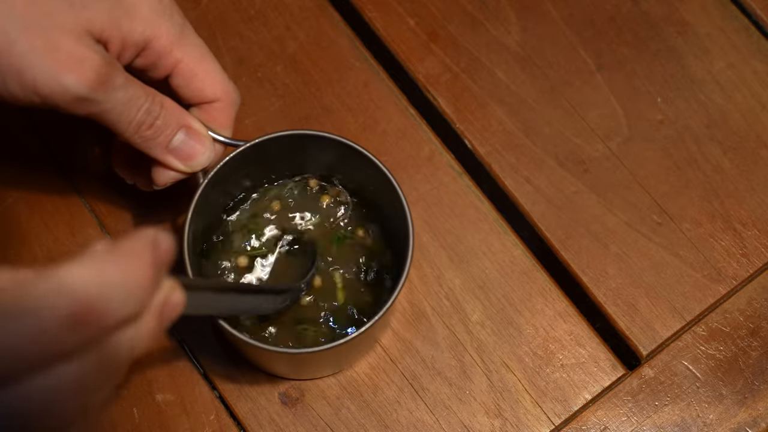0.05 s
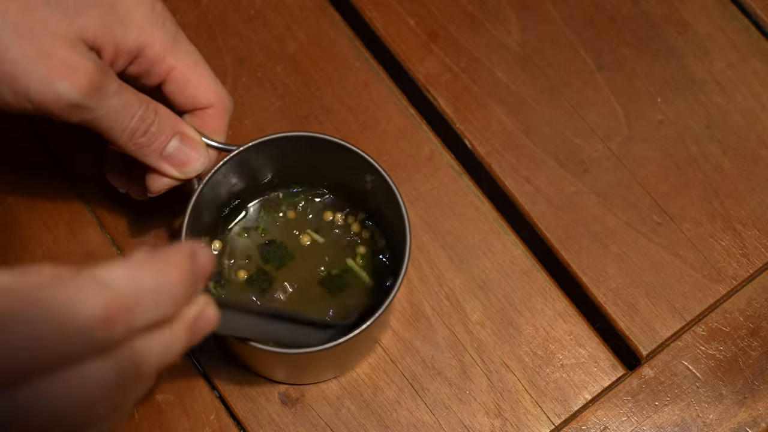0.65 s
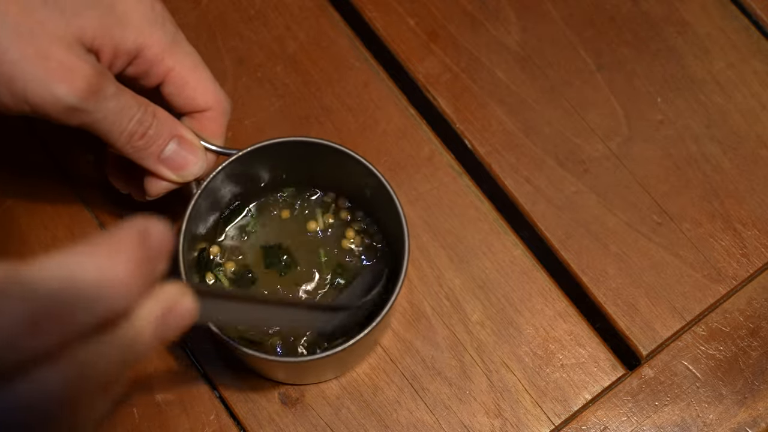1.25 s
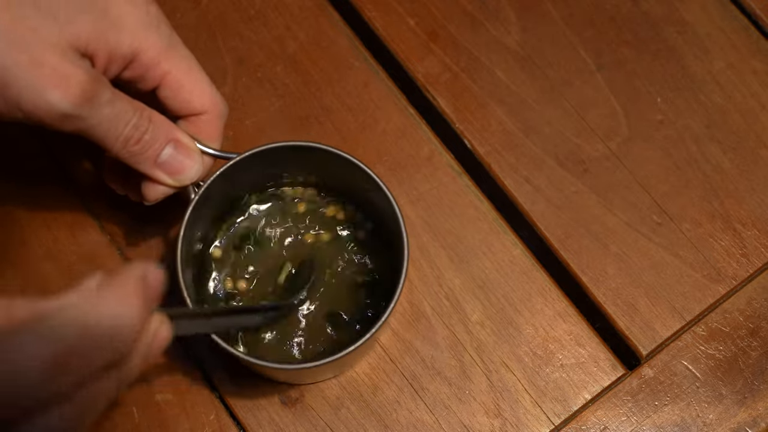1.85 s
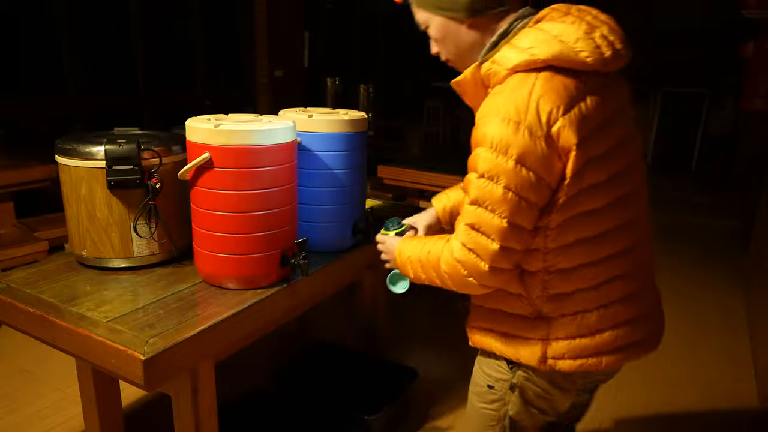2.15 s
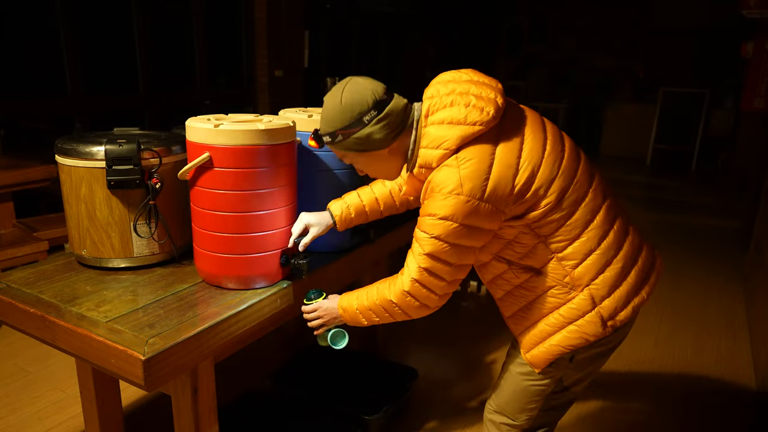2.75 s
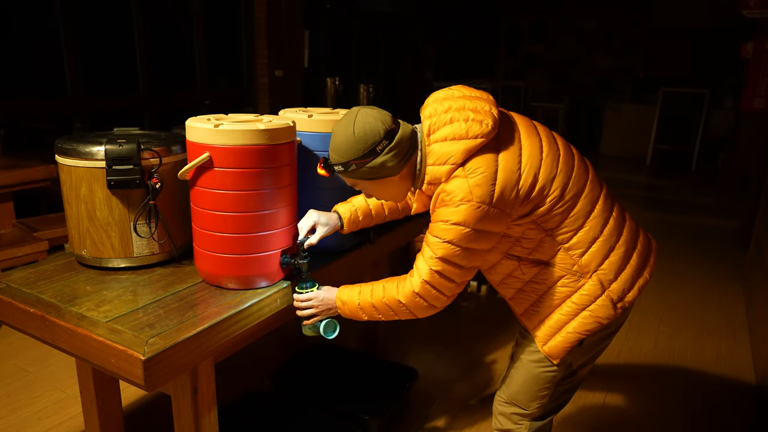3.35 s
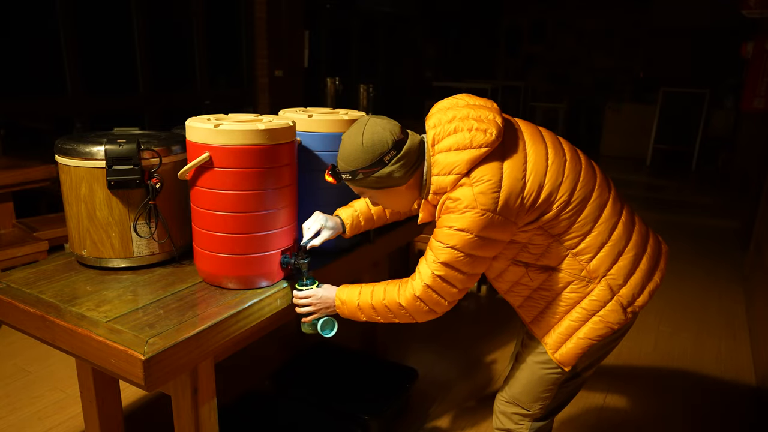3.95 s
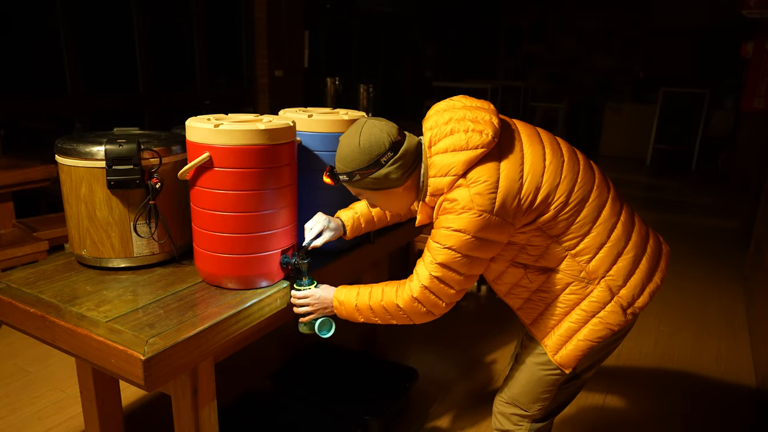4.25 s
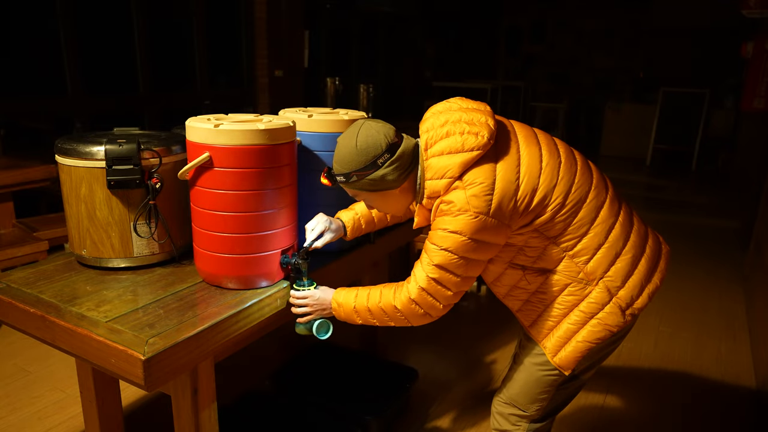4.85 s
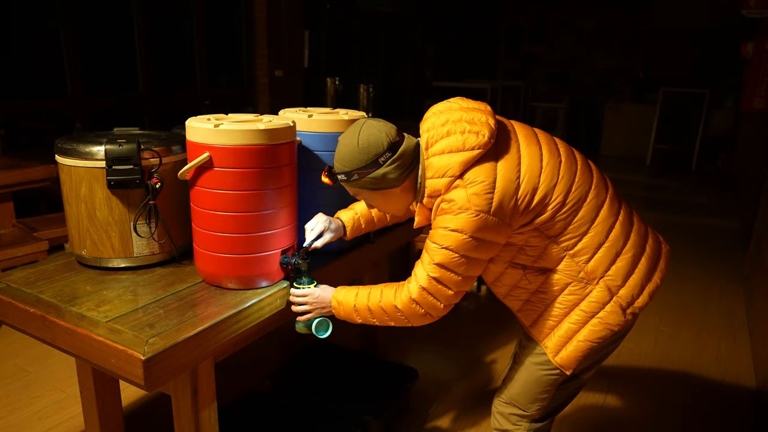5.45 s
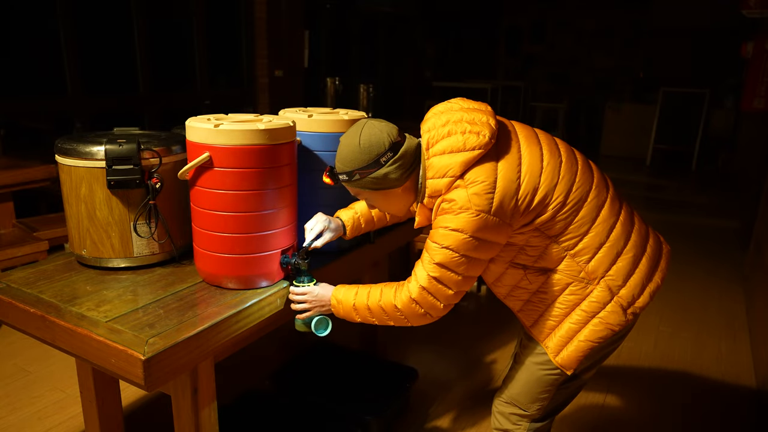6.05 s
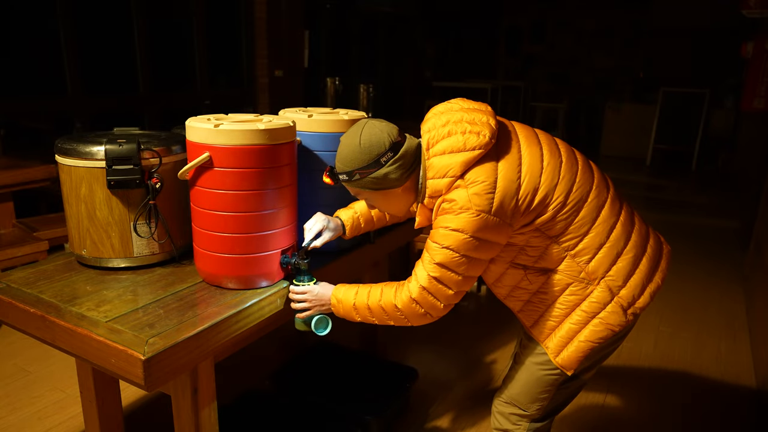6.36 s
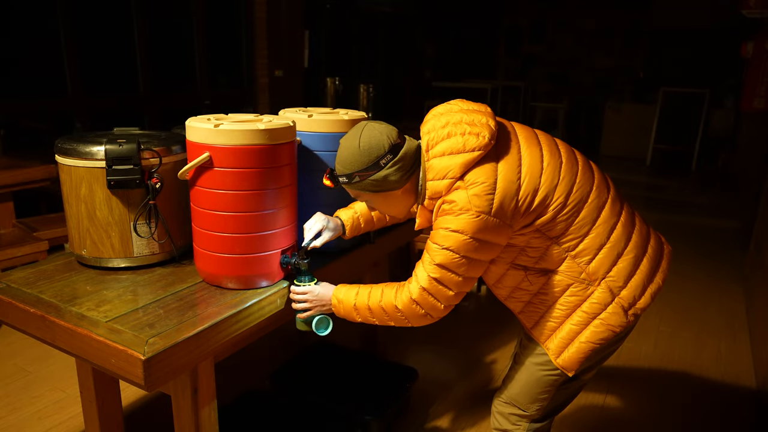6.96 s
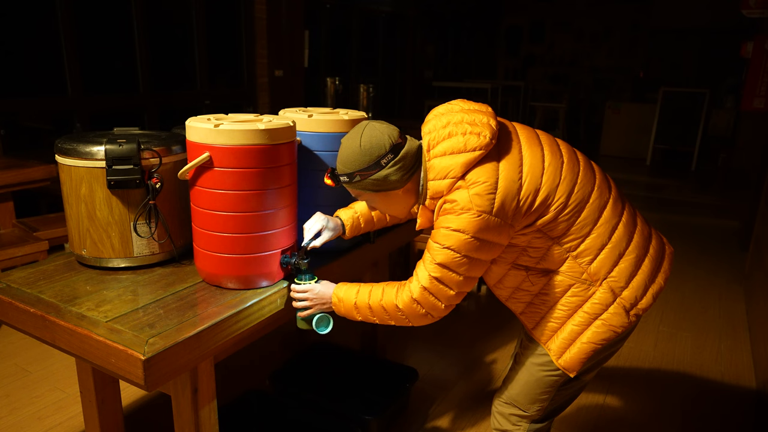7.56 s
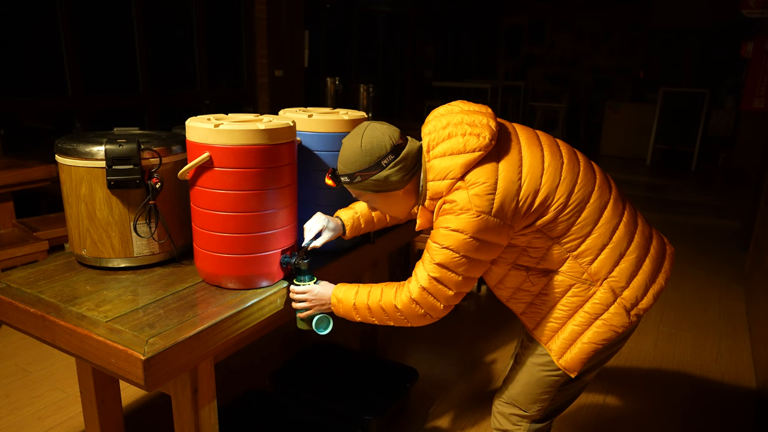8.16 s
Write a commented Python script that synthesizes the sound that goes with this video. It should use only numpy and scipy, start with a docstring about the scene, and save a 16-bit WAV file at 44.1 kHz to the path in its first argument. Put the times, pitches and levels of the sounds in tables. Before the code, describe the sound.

Close stirring in a metal cup gives way to rustling nylon and water trickling from a tap into a bottle in a quiet room.

```python
"""In a quiet hut a spoon stirs soup, scraping and knocking a small metal cup on a wooden table.
Stick-slip friction and impacts excite the cup's modes; near 2 s a bump shakes the microphone.
Then, farther off, a down jacket rustles by friction as someone bends to a water jug.
At 4.2 s its tap opens: a thin stream plops and spatters into a bottle, trapping bubbles that ring.
As the bottle fills, its air column shortens and rises in pitch."""
import sys
import numpy as np
from scipy import signal
from scipy.io import wavfile
from scipy.ndimage import uniform_filter1d

SR = 44100
rng = np.random.default_rng(int(sys.argv[2]) if len(sys.argv) > 2 else 0)


def put_to_file(sound):
    """Save the sound as 16-bit audio at rate SR, in the file named by the first command-line argument."""
    columns = np.atleast_2d(sound).T  # one column per channel
    safe = np.clip(columns, -1, 1)
    whole_steps = np.round(safe * 32767)
    wavfile.write(sys.argv[1], SR, whole_steps.astype(np.int16))


N = 361619
T = np.arange(N) / SR
CUT_S = 2.053  # the scene moves from the table to the jug
OPEN_S, FULL_S = 4.23, 4.42  # the tap dribbles, then runs freely

# Spectrum of rustling nylon, also the hiss of the soup: frequency_hz, gain_db
RUSTLE_SPECTRUM = [(120, -31), (250, -15.5), (600, -10), (1050, -1.5), (1800, 6), (4000, 6), (7500, 2),
                   (12000, -11.5), (16000, -11)]
# Spectrum of a steel edge on metal: frequency_hz, gain_db
EDGE_SPECTRUM = [(1200, -27), (2000, 1), (2400, -1), (3400, 1.5), (4700, -7), (5900, 0), (7000, -2.5),
                 (11000, -6.5), (16000, -4.5)]
# Resonance of the air above the water: time_s, pitch_hz
AIR_COLUMN = [(4.2, 1435), (4.7, 1506), (5.3, 1563), (6, 1613), (7, 1730), (8.2, 1800)]


def amp(db):
    """Converts decibels to an amplitude ratio."""
    return 10 ** (np.asarray(db) / 20)


def unit(x):
    """Normalises to rms 1."""
    return x / np.sqrt(np.mean(x ** 2) + 1e-20)


def peaked(x):
    """Normalises to peak 1."""
    return x / (abs(x).max() + 1e-20)


def equal_energy(x, over_s=0.01):
    """Normalises a transient to the energy of rms 1 held for over_s."""
    return x / np.sqrt(np.sum(x ** 2) / (over_s * SR) + 1e-20)


def read(points, hz):
    """Interpolates a curve on a log-frequency axis."""
    f, value = np.transpose(points)
    return np.interp(np.log(hz + 1), np.log(f + 1), value)


def follow(points, time_s=T):
    """Interpolates a curve in time."""
    return np.interp(time_s, *np.transpose(points))


def between(start_s, end_s, fade_s=0.00084):
    """A gate with linear ramps."""
    return np.clip((T - start_s) / fade_s, 0, 1) * np.clip((end_s - T) / fade_s, 0, 1)


def add(mix, start_s, sound):
    """Superposes a sound on the mix."""
    part = mix[max(round(start_s * SR), 0):][:len(sound)]
    part += sound[:len(part)]


def colour(x, spectrum, size=4096):
    """A minimum-phase filter with the given spectrum."""
    log_gain = np.log(amp(np.maximum(read(spectrum, abs(np.fft.fftfreq(size, 1 / SR))), -100)))
    taps = np.fft.ifft(np.exp(np.conj(signal.hilbert(log_gain)))).real
    return signal.oaconvolve(x, taps[:size // 2])[:len(x)]


def passband(x, kind, hz, order=2):
    """A maximally flat low-, high- or band-pass filter."""
    return signal.sosfilt(signal.butter(order, hz, kind, fs=SR, output="sos"), x)


def resonate(x, hz, width_hz):
    """A damped resonator of gain about 1 at a fixed or moving pitch."""
    r = np.exp(-np.pi * width_hz / SR)
    if np.ndim(hz) == 0:
        return 2 * signal.lfilter([1 - r], [1, -r * np.exp(2j * np.pi * hz / SR)], x + 1e-18).real
    turn = np.exp(2j * np.pi * np.cumsum(hz) / SR)
    return 2 * (turn * signal.lfilter([1 - r], [1, -r], x / turn + 1e-18)).real


def grains(per_s, spread_db, count=N):
    """Shot noise: random impulses of either sign, a few larger than the rest by a spread in level."""
    size = amp(spread_db * np.minimum(rng.exponential(1, count), 3.5))
    return size * rng.choice([-1, 1], count) * (rng.random(count) < per_s / SR)


def burst(decay_s, count=3500):
    """Exponentially decaying noise."""
    return rng.standard_normal(count) * np.exp(-np.arange(count) / SR / decay_s)


def bubble(hz, rise_s, glide=0., count=3500):
    """Trapped air pulsates as a damped oscillator, its pitch gliding up as it nears the surface."""
    age = np.arange(count) / SR / rise_s
    envelope = np.tanh(1.73 * age) * np.exp(-(age / 2.29) ** 1.115)
    pitch_hz = hz * (1 + glide * np.tanh(age / 2 - 1))
    return peaked(envelope) * np.sin(2 * np.pi * np.cumsum(pitch_hz) / SR)


def hush(level_db=-61):
    """The hut's noise floor: steady broadband noise, strongest in the bass."""
    # frequency_hz, gain_db
    spectrum = [(12, -49.5), (20, -8.5), (96, 5.5), (182, -2.5), (293, -4.5), (337, -5), (590, -4.5),
                (873, -8), (1220, -5.5), (2460, -15.5), (4540, -20), (6360, -18.5), (8410, -24.5),
                (14700, -17.5), (16000, -21.5)]
    return amp(level_db) * unit(colour(rng.standard_normal(N), spectrum))


def hut(x):
    """Reverberation: dense reflections from wooden walls decay exponentially, the treble first."""
    # Reverberation times: frequency_hz, t60_s
    decay_times = [(200, 1), (800, 0.92), (2000, 0.99), (5500, 0.41), (10000, 0.43), (16000, 0.12)]
    reflections = rng.standard_normal(SR) * (np.arange(SR) > .006 * SR)
    hz, t, spectra = signal.stft(reflections, SR, nperseg=256)
    tail = signal.istft(spectra * amp(-60 * t / read(decay_times, hz)[:, None]), SR, nperseg=256)[1]
    return signal.fftconvolve(x, tail / np.linalg.norm(tail))[:N]


def cup(x, wall_ratio=1):
    """Normal modes of the cup, damped by soup and fingers; sloshing soup shifts the upper ones."""
    # pitch_hz, width_hz, gain_db
    modes = [(190, 120, -3.5), (519.5, 25, 11), (655, 42, 3), (806, 110, 1.5), (1068, 51, 18),
             (1240, 67, 13), (1825, 100, 1.5)]
    ring = sum((-1) ** k * amp(db) * resonate(x, hz * wall_ratio if hz > 1000 else hz, width)
               for k, (hz, width, db) in enumerate(modes))
    return passband(ring, "high", 200, order=3)


def soup():
    """Flow noise: the spoon swishes through the liquid, excites the cup and frees a few bubbles."""
    # Envelope of the swish: time_s, level_db
    stirring = [(0, -47.5), (.05, -52.5), (.12, -58), (.2, -66), (.42, -99), (1.08, -85), (1.15, -44.5),
                (1.23, -53), (1.45, -65)]
    # Freed bubbles: start_s, peak_db, pitch_hz, rise_s
    bubbles = [(0.0641, -16.5, 1134, 0.0031), (0.1006, -36.5, 3500, 0.00035), (0.1227, -41, 11900, 0.00049),
               (1.947, -36.5, 1570, 0.00094)]
    flow = grains(per_s=2100, spread_db=1.0)
    slosh = unit(resonate(resonate(flow, 790, 650), 790, 650))
    hiss = unit(colour(flow, RUSTLE_SPECTRUM))
    swish = unit(0.42 * unit(cup(flow)) + 0.64 * slosh + .5 * hiss)
    out = swish * amp(follow(stirring)) * between(0, 1.3)
    for start_s, db, hz, rise_s in bubbles:
        add(out, start_s, amp(db) * bubble(hz, rise_s, glide=0.0027))
    return out


def wall(x, progress, place_spread=0.025, drift=0.035):
    """The thin wall's bright modes differ from place to place and drift as the spoon travels."""
    # pitch_hz, width_hz, gain_db
    modes = [(2824, 130, 6.5), (3300, 89, 2), (3900, 280, 1), (4400, 180, -1.5), (5020, 160, 2),
             (5600, 180, 2), (5960, 270, 5), (6600, 200, -0.5), (7440, 380, 1), (8700, 260, -5.5),
             (9900, 300, -4), (10800, 460, 1), (14400, 600, -2.5)]
    travel = drift * (np.minimum(progress, 1) - .5)
    metal = np.zeros(len(x))
    for hz, width, db in modes:
        detune = 1 + place_spread * rng.standard_normal() + travel * rng.standard_normal()
        metal += amp(db) * resonate(x, hz * detune, width)
    spot = burst(0.00086)  # each spot adds its own close, short-lived modes
    return 0.56 * metal + 0.92 * signal.fftconvolve(metal, spot / np.linalg.norm(spot))[:len(x)]


def scrapes(ease_db_per_s=191.5, lift_s=0.0031, chatter_width_hz=480, brighten=0.15, count=10000):
    """Stick-slip friction rings the cup; pressure brightens a stroke and speed raises its chatter."""
    # Spoon strokes: start_s, hardest_s, end_s, level_db, swell_db_per_s, cup_db, edge_db,
    # chatter_from_hz, chatter_to_hz, wall_ratio
    strokes = [(0.4346, 0.476, 0.49, -34.5, 109.5, -3, -8, 3060, 3860, 1.06),
               (0.521, 0.534, 0.6, -32, 600, 2, 7.5, 3620, 6200, 0.95),
               (0.568, 0.606, 0.61, -32, 160, -1, 5.5, 5660, 8050, 1.14),
               (0.616, 0.62, 0.69, -44, 30, 6, -2, 2980, 2400, 1.05),
               (.683, 0.741, 0.79, -27, 184, -1, -6, 2160, 4800, 1.01),
               (0.819, 0.86, 0.89, -35.5, 212, 3, 4.5, 2500, 3300, 1.03),
               (0.897, 0.945, 0.94, -45, 132, 7.5, 8, 2000, 2080, 1),
               (0.948, 1.003, 1.03, -37.5, 131, -2, 5, 1910, 2090, 1.02),
               (1.088, 1.125, 1.148, -36.5, 130, 2, 6.5, 3750, 5600, 1.054),
               (1.59, 1.592, 1.596, -26, 100, -5, -4.5, 3140, 6200, 1.0),
               (1.596, 1.61, 1.67, -34, 27, -1.5, -4.5, 3080, 3180, 1.02),
               (1.66, 1.731, 1.789, -23, 160, -6, -4.5, 2760, 4400, 1.094),
               (1.815, 1.855, 1.862, -41, 160, 1.5, -1, 3300, 4700, 1.1)]
    out, t = np.zeros(N), np.arange(count) / SR
    for start, hardest, end, db, swell, cup_db, edge_db, from_hz, to_hz, wall_ratio in strokes:
        slips = grains(per_s=12000, spread_db=3.5, count=count)
        grit_db = 2 * unit(uniform_filter1d(rng.standard_normal(count), size=45))
        catches = grains(per_s=700, spread_db=4.0, count=count)
        slips = unit(unit(slips * amp(grit_db)) + 0.53 * unit(catches))
        progress, past_s = t / (end - start), start + t - hardest
        contact = np.minimum(t / 0.0008, 1) * np.exp(-np.maximum(start + t - end, 0) / lift_s)
        press_db = np.minimum(swell * past_s, -ease_db_per_s * past_s)
        force = contact * amp(db + press_db)
        chatter_hz = np.interp(progress, [0, 1], [from_hz, to_hz])
        chatter = resonate(slips, chatter_hz, chatter_width_hz)
        chatter += 0.14 * resonate(slips, 1.52 * chatter_hz, chatter_width_hz)
        chatter = force * amp(-3) * unit(passband(chatter, "high", 1500))
        hiss = force * amp(edge_db - 1 + brighten * press_db) * unit(colour(slips, EDGE_SPECTRUM))
        metal = wall(hiss + .5 * chatter, progress)
        ring = amp(cup_db) * cup(slips * force, wall_ratio) / cup(slips, wall_ratio).std()
        add(out, start, ring + 0.63 * chatter + 0.8 * metal + 0.5 * hiss)
    return out


def knocks():
    """Impact excitation: steel clicks, then the cup and the table ring with their impulse responses."""
    # Blows of the spoon: start_s, ring_db, click_db, thud_db
    blows = [(0.4353, -27, -43.5, -59.5), (0.503, -45, -35.5, -59.5), (0.558, -21, -36, -47.5),
             (0.6049, -10, -7, -13.5), (0.782, -30, -23, -33), (0.877, -28, -45, -50),
             (0.867, -29.5, -40, -38.5), (1.089, -30, -28, -50.5), (1.147, -48.5, -49, -34.5),
             (1.59, -26, -23.5, -60), (1.66, -22.5, -20, -37)]
    # Modes of the wooden table: pitch_hz, width_hz, weight_db
    board_modes = [(139, 22, -17), (220, 16, -13), (439, 11, 2), (500, 11.3, 10), (570, 5, 2)]
    out, impulse = np.zeros(N), signal.unit_impulse(SR // 3)
    ring = peaked(cup(impulse))
    boards = sum(amp(db) * resonate(impulse, hz, width) / np.sqrt(width) for hz, width, db in board_modes)
    thud = peaked(passband(boards, "high", 93))
    for start_s, ring_db, click_db, thud_db in blows:
        click = np.tanh(unit(colour(burst(decay_s=0.0004), EDGE_SPECTRUM)) / 4)
        add(out, start_s, amp(click_db) * peaked(passband(click, "high", 400)))
        add(out, start_s + 0.00261, amp(ring_db) * ring)
        add(out, start_s + 0.00366, amp(thud_db) * thud)
    return out


def bump():
    """Structure-borne sound: the bumped microphone shudders at its mount's natural frequencies."""
    # Modes of the mount: pitch_hz, gain_db
    modes = [(42, 15), (82, 10)]
    # Envelope of the shudder: time_s, level_db
    shudder = [(1.85, -52), (1.87, -38), (1.96, -31.5), (1.986, -37), (2.01, -37), (2.05, -42.5)]
    shake = sum(amp(db) * np.sin(2 * np.pi * hz * T) for hz, db in modes)
    rumble = passband(rng.standard_normal(N), "low", 110, order=4)
    envelope = amp(follow(shudder)) * between(1.855, CUT_S + 0.0055, fade_s=0.0083)
    return unit(unit(shake) + 0.22 * unit(rumble)) * envelope


def jacket(weave_hz=3300, weave_rise_hz=1150, crumple_db=0.6):
    """Friction noise: padding rubs, nylon hisses, and sleeves zip higher as they slide faster."""
    # Turning, bending, reaching and settling: fastest_s, half_length_s, rub_db, swish_db
    moves = [(2.098, 0.25, -55, -50.5), (2.534, 0.29, -47, -44.5), (2.897, 0.2, -64.5, -52),
             (3.44, 0.4, -64.5, -62.5), (3.962, 0.018, -60, -81), (4.066, 0.026, -63, -80),
             (4.187, 0.029, -66, -84)]
    speed = np.array([np.exp(-((T - s) / half_s) ** 2) for s, half_s, _, _ in moves])
    rub, swish = np.sqrt(amp(np.transpose(moves)[2:]) ** 2 @ speed ** 2)  # moves add in power
    cloth = colour(grains(per_s=6800, spread_db=0.0), RUSTLE_SPECTRUM)
    padding = unit(passband(cloth, "band", [180, 815]))
    weave = unit(resonate(cloth, weave_hz + weave_rise_hz * peaked(swish), width_hz=1300))
    sleeves = unit(unit(passband(cloth, "band", [2260, 5500])) + 0.27 * weave)
    hiss = np.sqrt(rub * swish) * unit(passband(cloth, "band", [7500, 16000]))
    folds = amp(crumple_db * unit(uniform_filter1d(rng.standard_normal(N), size=900)))
    rustle = amp(-1) * (rub * padding + swish * sleeves) + amp(-4) * hiss
    return rustle * folds * between(CUT_S, 4.6)


def bottle(x, direct_share=0.46):
    """Standing waves across the bottle colour a splash."""
    # Transverse air modes: pitch_hz, width_hz, gain_db
    modes = [(2700, 67, 0.5), (3526, 65, 3.5), (3890, 150, 4.5), (4505, 150, 0), (5300, 350, 5),
             (5730, 220, 5.5), (7180, 340, -0.5), (9470, 250, -5), (10270, 110, -4), (11200, 300, -6),
             (11850, 230, -1.5), (14700, 400, 2)]
    return direct_share * x + sum(amp(db) * resonate(x, hz, width) for hz, width, db in modes)


def scatter(per_s, count=90):
    """Jittered moments of the pour, each with three normally distributed values."""
    draws = rng.standard_normal((count, 4))
    times = FULL_S + (np.arange(count) + 1 + np.tanh(draws[:, 0]) / 2) / per_s
    return [(s, *chance) for s, chance in zip(times, draws[:, 1:]) if s < T[-1]]


def ticks():
    """Drop impact: a crack, a splash and a trapped bubble's ping. Returns drops and treble spray."""
    # Ticks of handling the bottle, and drops striking it: start_s, ping_db, ping_hz, splash_db, spray_db
    impacts = [(2.069, -50, 2620, -49, -64), (2.082, -44, 2630, -49, -66), (3.449, -64, 3000, -67, -78),
               (4.117, -64, 3550, -73, -75), (4.2311, -31.5, 7360, -36, -44), (4.276, -62, 4590, -58, -51),
               (4.337, -49, 5300, -42, -56), (4.3764, -35.5, 5730, -29, -53), (4.402, -47, 5280, -44, -50),
               (4.4302, -40.5, 3830, -45, -55), (4.47, -41, 2670, -39, -50), (4.489, -52, 4010, -38.5, -54),
               (4.6628, -46, 4350, -48, -56), (4.6777, -35, 4290, -48, -60), (4.749, -43, 2870, -45, -56),
               (4.868, -52, 5710, -42, -61), (4.8823, -30, 9730, -27.5, -23.5),
               (4.894, -37, 11050, -43, -41), (4.999, -42, 4410, -47, -52), (5.2021, -43, 2900, -43, -52),
               (5.2494, -38.5, 5700, -40.5, -51), (5.2786, -36, 5790, -43, -69),
               (5.3582, -43, 4440, -47, -52), (5.5945, -42.5, 4410, -45, -66),
               (5.6968, -42, 9300, -50, -43.5), (5.8645, -42.5, 5600, -42, -51),
               (6.1389, -44.5, 7280, -46, -57), (6.2706, -43, 9650, -42.5, -39),
               (6.6422, -52, 5530, -43, -52), (6.6842, -45, 4630, -45.5, -53), (6.736, -45, 4600, -41, -51),
               (6.744, -35, 5920, -39, -52), (6.7982, -41, 3000, -54, -68), (6.9162, -42, 5800, -49, -72),
               (7.1995, -44.5, 5860, -51, -70), (7.3265, -47, 2630, -46, -43),
               (7.383, -43.5, 4700, -44, -50), (7.5412, -43, 5800, -46, -52), (7.7373, -44, 4900, -42, -50)]
    drops, spray = np.zeros(N), np.zeros(N)
    lesser = [(s, -54 + size, 4670 * 2 ** (0.356 * np.clip(pitch, -2, 2)), -51 + size / 2, -62 + crisp)
              for s, size, pitch, crisp in scatter(per_s=11)]
    for start_s, ping_db, ping_hz, splash_db, spray_db in impacts + lesser:
        splash = bottle(burst(decay_s=0.0054) + 0.7 * burst(decay_s=0.00061))
        middle = passband(splash, "band", [2300, 8000], order=5)
        treble = passband(splash, "band", [8200, 14000], order=4)
        ping = bubble(ping_hz, rise_s=0.00087)
        add(drops, start_s, amp(splash_db - 1) * equal_energy(middle))
        add(spray, start_s, amp(spray_db + 0.5) * equal_energy(treble))
        add(drops, start_s + 0.00066, amp(ping_db + 0.5) * equal_energy(ping))
    return drops, spray


def neck(x):
    """Cavity resonance: the air in the neck bounces on the air in the bottle, a hollow note."""
    # pitch_hz, width_hz, gain_db
    modes = [(436, 20, 9), (490, 54, 0), (585, 190, -26)]
    return sum(amp(db) * resonate(x, hz, width) for hz, width, db in modes)


def shallow_db(time_s, empty_db=-36, deepen_s=0.33):
    """Bubbles need depth: their level recovers as a pool forms under the stream."""
    return empty_db * np.exp(-np.maximum(time_s - OPEN_S, 0) / deepen_s)


def stream(dribble_db=-9.5, gurgle_db=-42, column_db=-48, fade_db_per_s=2.5):
    """Air entrainment: small bubbles drive the neck and the air column, which rings less as it fills."""
    flow = amp(np.interp(T, [FULL_S - .06, FULL_S], [dribble_db, 0]))
    flow *= between(OPEN_S, np.inf, fade_s=0.0069)
    column_hz = follow(AIR_COLUMN)
    bubbles = np.zeros(N)
    for hz in np.geomspace(420, 2000, 16):
        births = grains(per_s=12, spread_db=2.5)
        bubbles += signal.oaconvolve(births, bubble(hz, rise_s=1.19 / hz, glide=0.14))[:N]
    gurgle = unit(passband(neck(bubbles) + 0.021 * bubbles, "high", 382, order=10))
    ring = unit(passband(resonate(bubbles, column_hz, width_hz=103), "high", 350))
    ring_db = column_db + 0.059 * shallow_db(T) - fade_db_per_s * (T - OPEN_S)
    return (amp(gurgle_db + shallow_db(T)) * gurgle + amp(ring_db) * ring + spatter(column_hz)) * flow


def spatter(column_hz, spurt_s=0.0033, shared_share=0.3, fizz_db=-15, quality=4.2):
    """Tiny splashes, spurts of noise in one band or several at once, excite the bottle's air modes."""
    # Overtones of the air column: pitch_ratio, width_hz, gain_db
    overtones = [(1.86, 126, 3), (2.75, 200, 1)]
    # Less spatter as the bottle fills: time_s, level_db
    envelope = [(4.25, -43.5), (4.7, -48), (5.3, -46.5), (6.5, -51), (7.1, -49), (7.5, -50.5), (8.2, -51.5)]
    # Spectrum of the spray: frequency_hz, gain_db
    spectrum = [(1240, -56), (2100, -16), (2500, 0.5), (3400, 0.5), (5700, -0.5), (6600, -2), (8600, -7),
                (14000, -7), (16000, -7)]
    drops, splash = abs(grains(per_s=45, spread_db=4.0)), np.zeros(N)
    for hz in np.geomspace(2800, 13500, 13):
        hits = abs(grains(per_s=8, spread_db=4.0)) + drops * (rng.random(N) < shared_share)
        spurts = signal.lfilter([1], [1, -np.exp(-1 / (spurt_s * SR))], hits) * rng.standard_normal(N)
        splash += resonate(resonate(spurts, hz, hz / quality), hz, hz / quality)
    splash = unit(splash) + amp(fizz_db) * rng.standard_normal(N)
    column = sum(amp(db) * resonate(splash, ratio * column_hz, width) for ratio, width, db in overtones)
    return amp(follow(envelope)) * unit(colour(column + bottle(splash, direct_share=0.39), spectrum))


def plops(slap_db=6, column_db=8, fade_db_per_s=3.5, neck_db=-9, rise_cycles=2.41):
    """Cavity collapse: each air pocket slaps shut and booms; the neck and air column ring on."""
    # Large pockets pulled under by the stream: start_s, boom_db, pitch_hz, shut_db
    pockets = [(4.233, -41, 675, -42.5), (4.397, -40, 706, -47.5), (4.51, -31.5, 675, -42),
               (4.562, -33, 539, -40), (4.592, -28.5, 584, -45.5), (4.687, -41, 800, -29),
               (4.804, -29, 557, -57), (5.027, -19.5, 604, -40), (5.04, -34, 465, -57),
               (5.064, -27.5, 490, -42.5), (5.216, -26.5, 464, -44), (5.26, -29, 695, -43),
               (5.79, -28.5, 490, -41), (5.1996, -22, 463, -37), (5.319, -24, 610, -37),
               (5.368, -27.5, 496, -32), (5.485, -25.5, 500, -54), (5.508, -27, 481, -35),
               (5.699, -27, 460, -35.5), (5.819, -18.5, 467, -38.5), (5.843, -24.5, 484, -50),
               (5.8645, -29, 555, -37), (5.922, -28, 439, -26.5), (6.076, -24.5, 458, -43),
               (6.133, -26, 480, -54), (6.231, -26, 490, -36.5), (6.294, -29, 480, -45),
               (6.317, -28, 447.5, -58), (6.526, -30.5, 460, -63), (6.816, -30, 480, -38),
               (7.02, -48, 480, -35.5), (7.081, -27, 480, -43), (7.123, -27, 500, -56),
               (7.225, -29, 466, -63), (7.541, -25, 473, -57), (7.615, -29.5, 480, -58),
               (6.452, -23.5, 649, -40), (6.473, -25, 447, -37), (6.678, -28.5, 500, -45),
               (6.735, -25.5, 467, -33.5), (6.597, -35, 524, -56), (6.63, -30, 490, -58),
               (6.692, -32, 500, -38), (6.719, -29.5, 597, -45), (6.855, -25, 437, -53),
               (6.916, -24, 471, -65), (6.985, -22, 453, -45), (7.062, -24, 494, -44),
               (7.148, -22.5, 510, -44), (7.201, -17.5, 480, -38.5), (7.329, -32, 490, -34),
               (7.406, -24.5, 480, -41), (7.785, -23.5, 480, -51), (7.887, -25.5, 480, -66),
               (7.98, -21, 475, -48), (8.021, -23.5, 467, -38.5), (8.08, -22.5, 452, -43),
               (8.128, -22.5, 485, -39.5), (8.182, -29, 497, -40)]
    booms, rings = np.zeros(N), np.zeros(N)
    lesser = [(s, -33.5 + shallow_db(s) + 3 * size, 480 * 2 ** (0.099 * pitch), -49.5 + 3 * force)
              for s, size, pitch, force in scatter(per_s=6.4)]
    for start_s, boom_db, hz, shut_db in pockets + lesser:
        rise_s = rise_cycles / hz * rng.uniform(0.44, 1.31)  # higher bubbles die sooner
        boom = bubble(hz, rise_s, glide=rng.uniform(0, 0.028))
        slosh = resonate(resonate(burst(decay_s=0.009), 870, 690), 860, 620)
        slap = bubble(rng.uniform(608, 930), rise_s=0.0012) + 0.27 * peaked(passband(slosh, "high", 720))
        ring = bubble(follow(AIR_COLUMN, start_s) * rng.uniform(1.0, 1.03), rise_s=0.003)
        ring_db = column_db - fade_db_per_s * (start_s - OPEN_S)
        add(booms, start_s, amp(boom_db - 1) * boom)
        add(rings, start_s + 0.000948, amp(shut_db) * (amp(slap_db) * slap + amp(ring_db) * ring))
    return passband(booms + amp(neck_db) * neck(booms) + rings, "high", 320, order=5)


def blips():
    """Bubble resonance: single small bubbles sing out and chirp upwards."""
    # start_s, peak_db, pitch_hz, rise_s, glide_share
    bubbles = [(4.57, -29, 1334, 0.0026, 0.2), (4.662, -37, 1770, 0.0027, 0.063),
               (4.808, -39.5, 1820, 0.0038, 0.046), (4.998, -31.5, 1580, 0.003, 0.043),
               (5.538, -32, 1630, 0.0038, 0.011), (5.586, -29, 1620, 0.0046, 0.0077),
               (6.338, -31.5, 1660, 0.0025, 0.05), (6.744, -28, 1663, 0.0025, 0.063),
               (4.398, -37, 1220, 0.0025, 0.094), (4.512, -38, 2700, 0.0018, 0.04),
               (4.757, -34, 2950, 0.0016, 0.04), (5.965, -35, 3450, 0.0012, 0.02),
               (7.147, -35.5, 3300, 0.0014, 0.02), (7.396, -36, 3390, 0.0013, 0.02),
               (7.864, -33, 5420, 0.00091, 0.02), (8.188, -34, 3500, 0.0015, 0.02)]
    out = np.zeros(N)
    for start_s, db, hz, rise_s, glide in bubbles:
        add(out, start_s, amp(db) * bubble(hz, rise_s, glide))
    return out


def scene():
    """Direct plus reverberant sound: the near cup, then the far jug. Treble reverberates most."""
    near = scrapes() + knocks() + soup()
    near_send = amp(-21) * near + amp(-17) * passband(near, "high", 3000)
    table = (near + hut(near_send)) * between(0, CUT_S) + bump()
    pour = plops() + blips() + stream()
    drops, spray = ticks()
    far_send = amp(-9) * pour + amp(-12) * drops + amp(-7) * spray
    jug = pour + drops + spray + hut(far_send) + jacket()
    return (table + jug + hush())[None]


def record(dry):
    """Band limiting: a linear-phase low-pass at 16 kHz."""
    return signal.oaconvolve(dry, signal.firwin(511, 16000, window=("kaiser", 9), fs=SR)[None], "same")


dry = scene()
out = record(dry)
put_to_file(out)
```